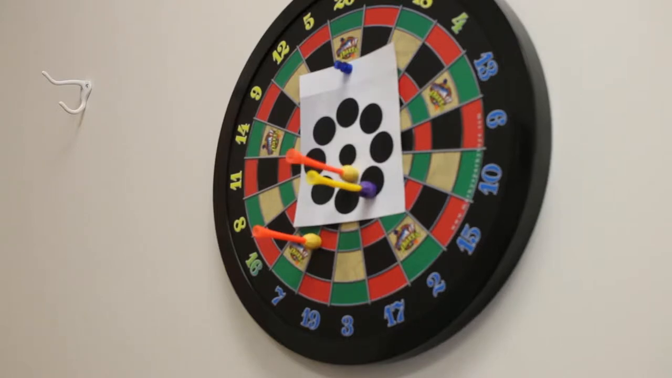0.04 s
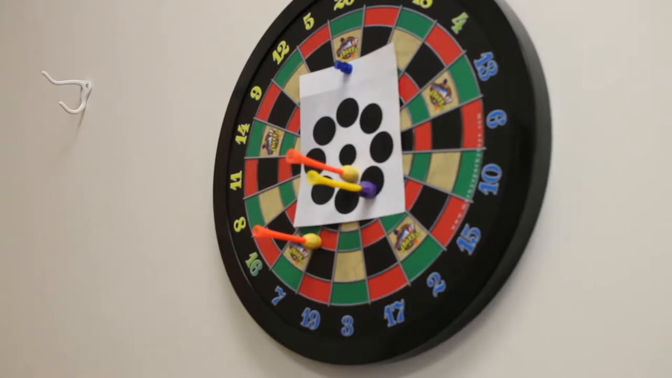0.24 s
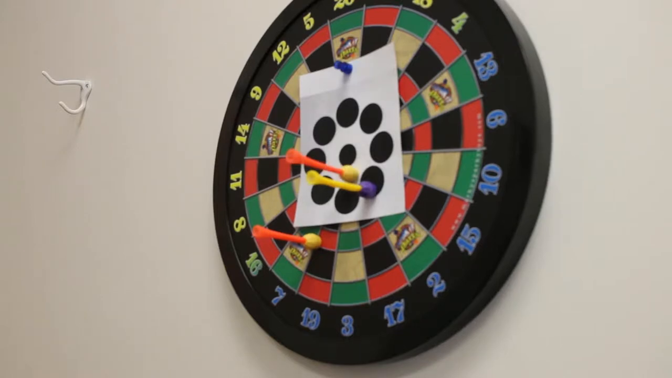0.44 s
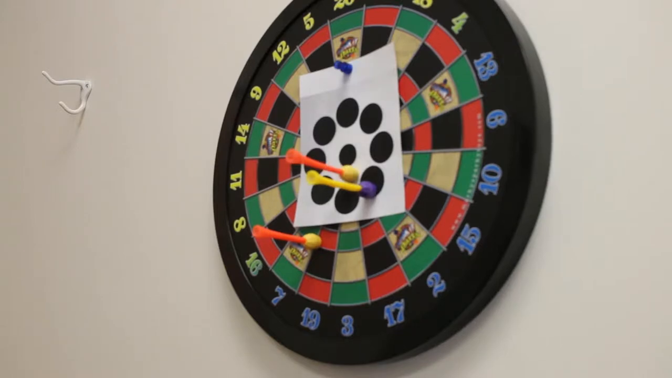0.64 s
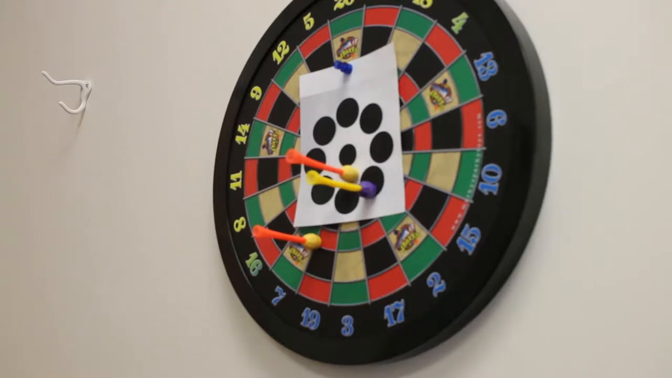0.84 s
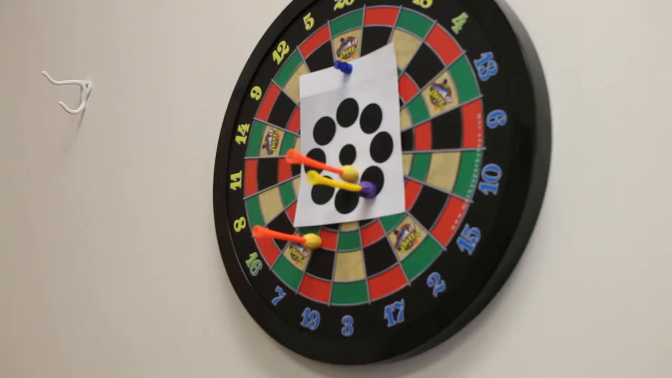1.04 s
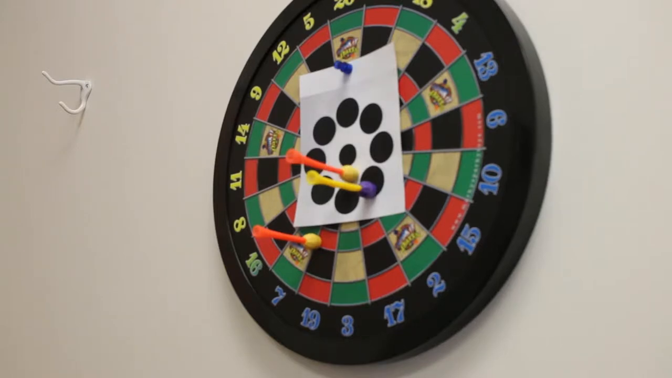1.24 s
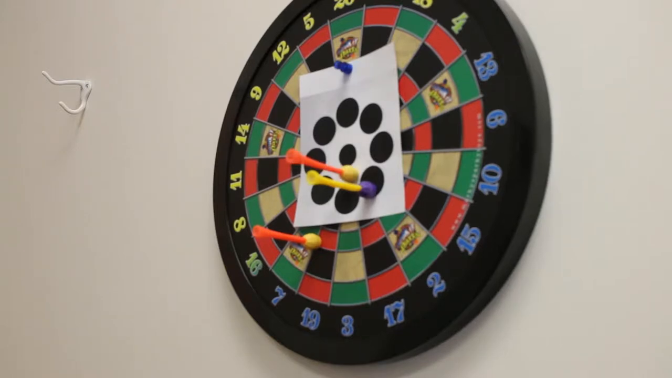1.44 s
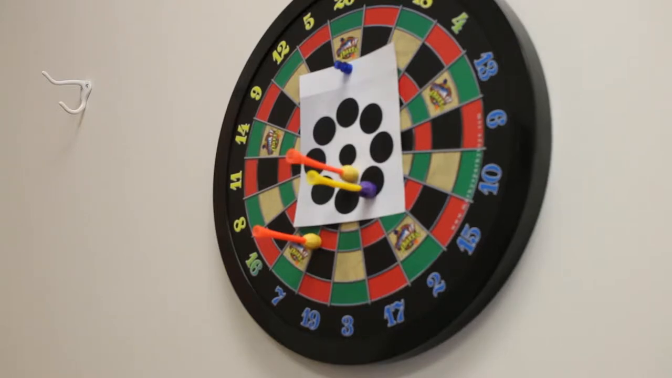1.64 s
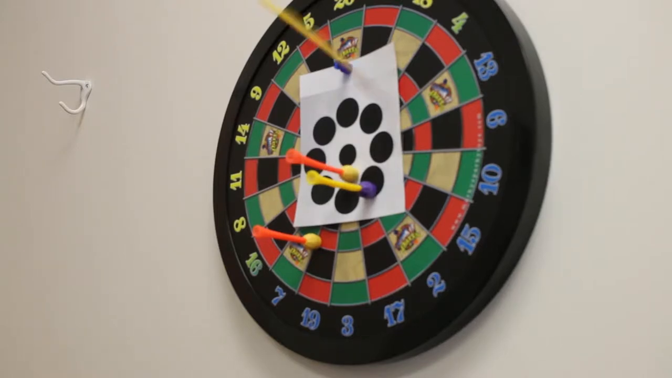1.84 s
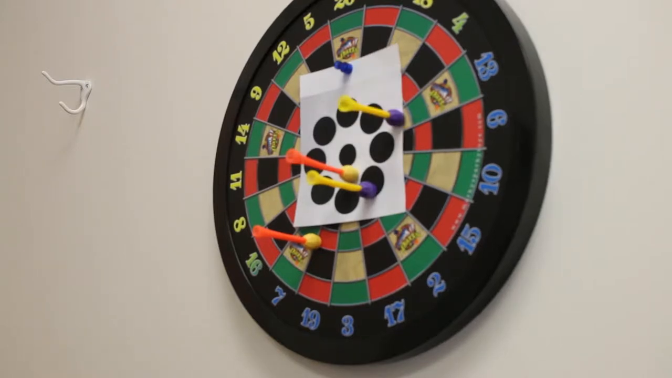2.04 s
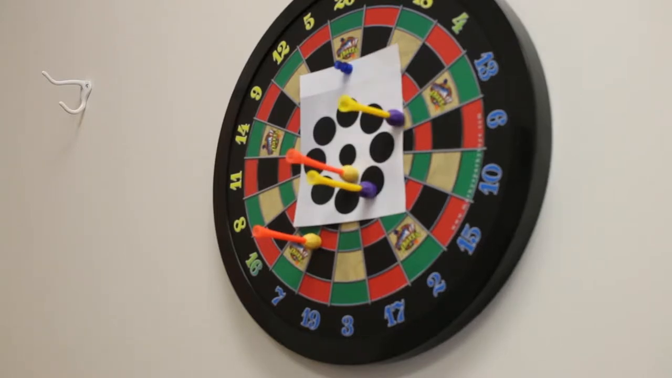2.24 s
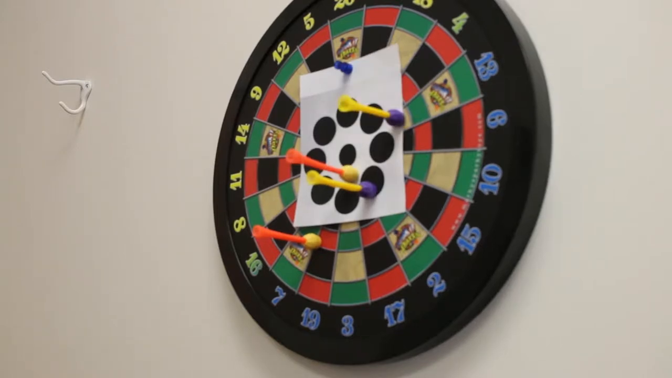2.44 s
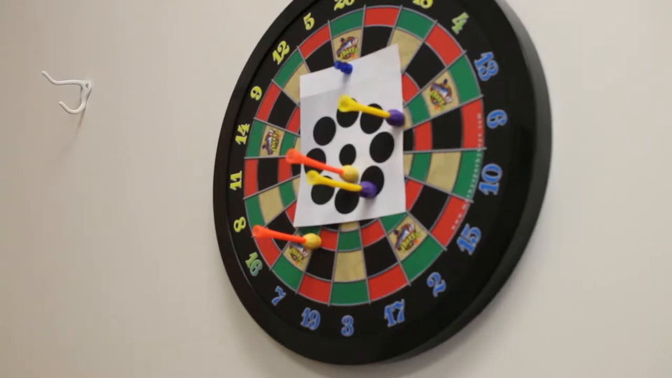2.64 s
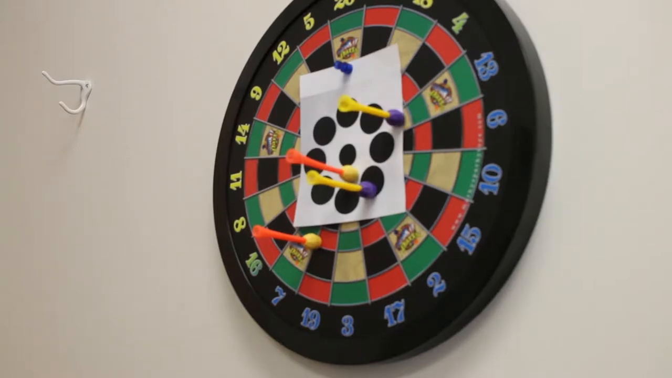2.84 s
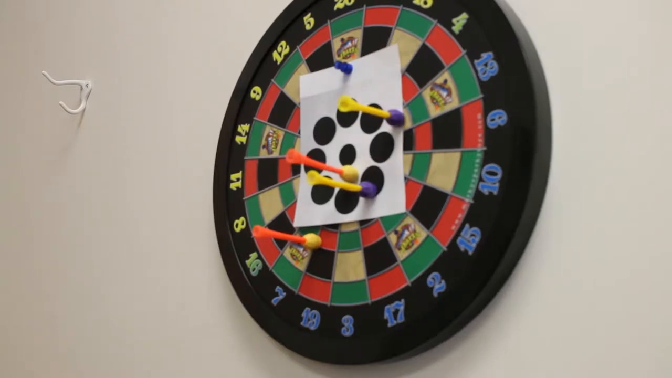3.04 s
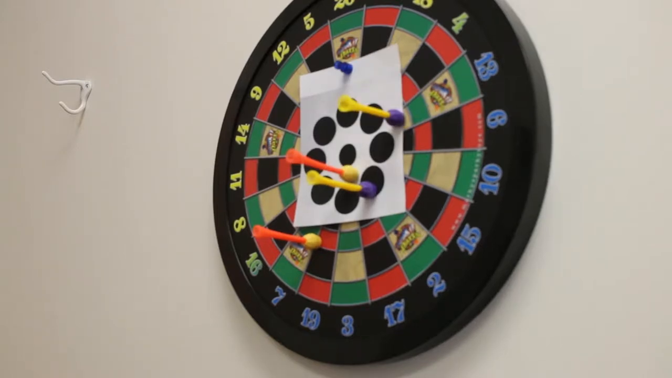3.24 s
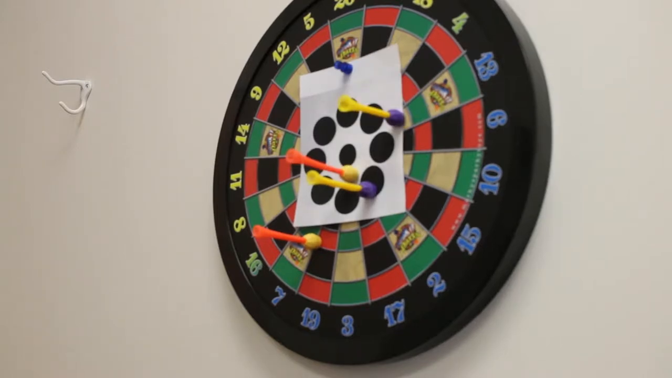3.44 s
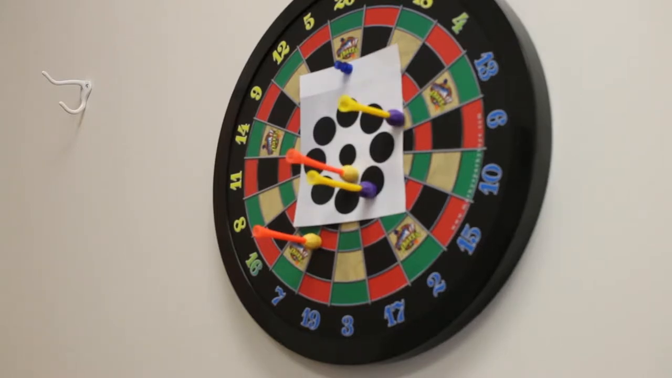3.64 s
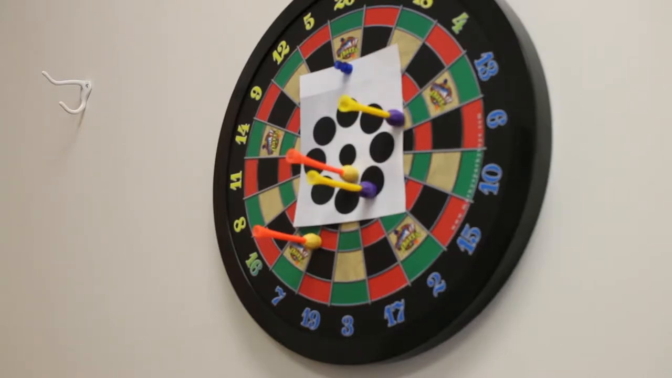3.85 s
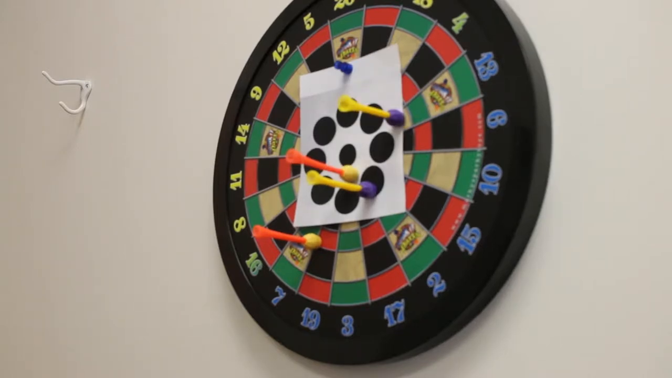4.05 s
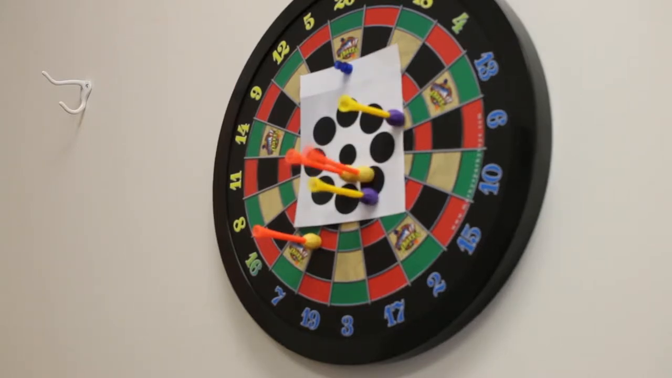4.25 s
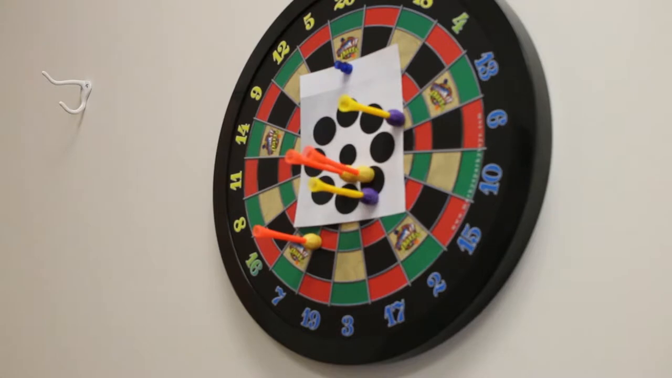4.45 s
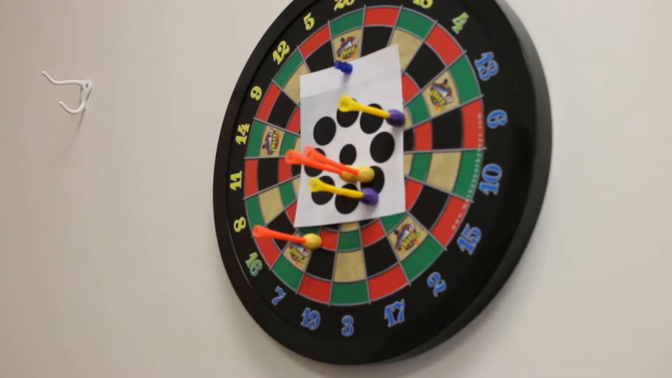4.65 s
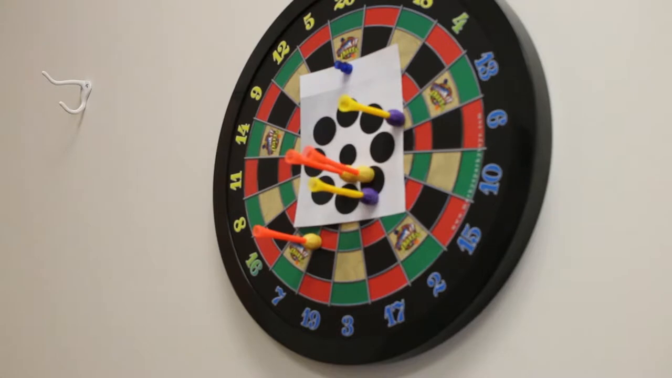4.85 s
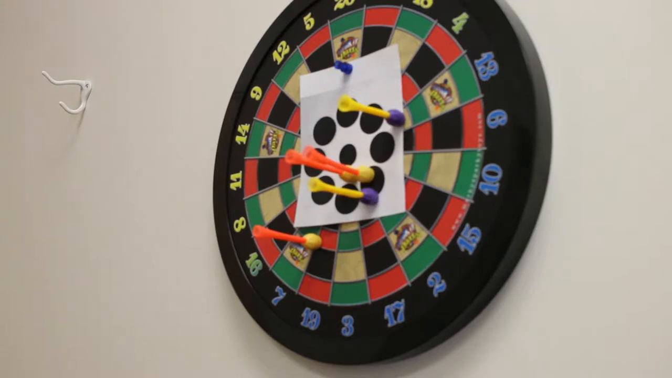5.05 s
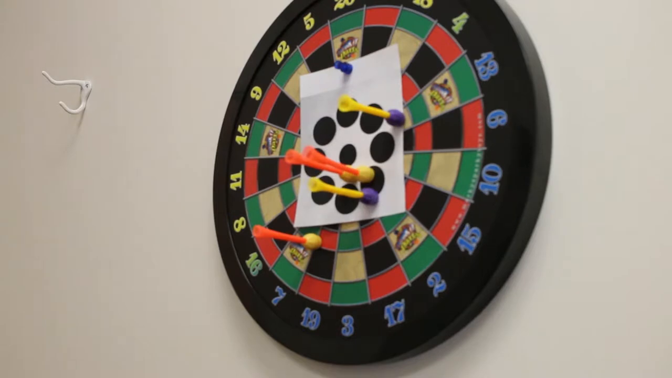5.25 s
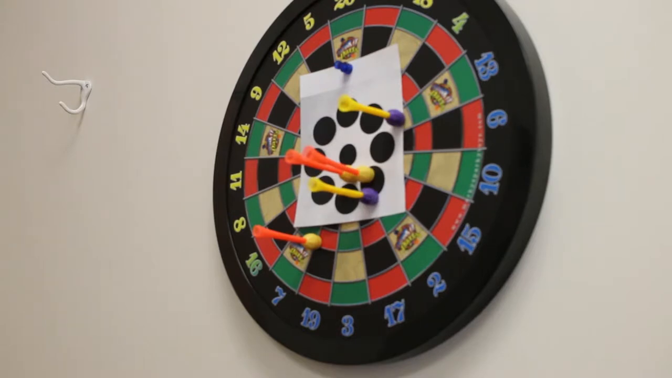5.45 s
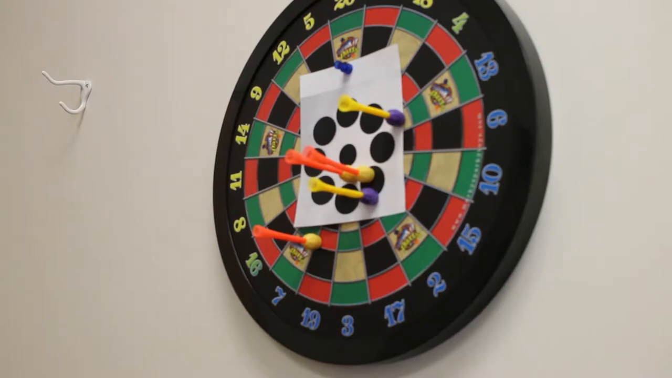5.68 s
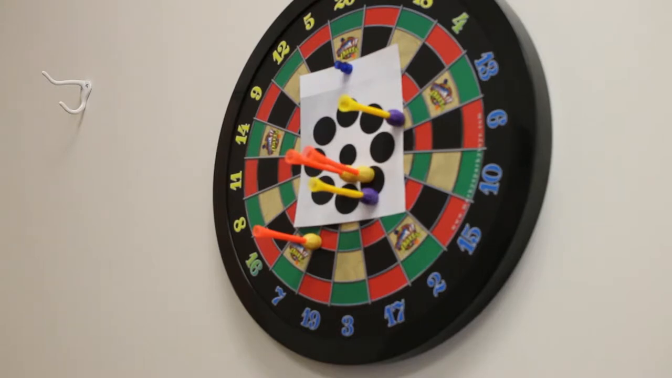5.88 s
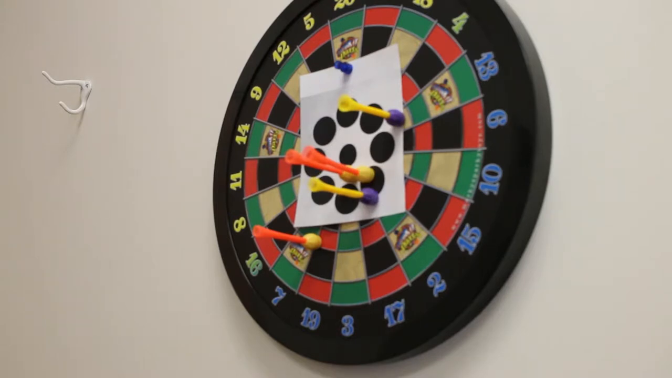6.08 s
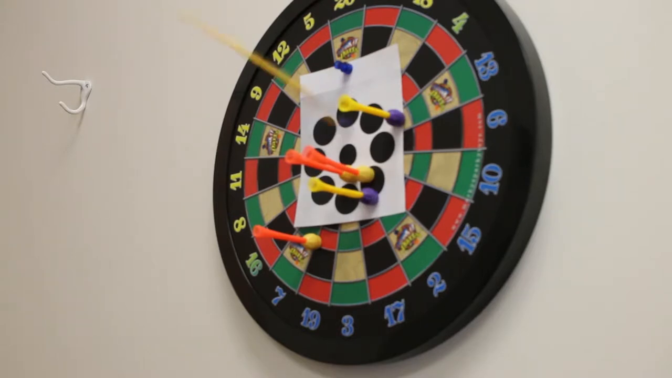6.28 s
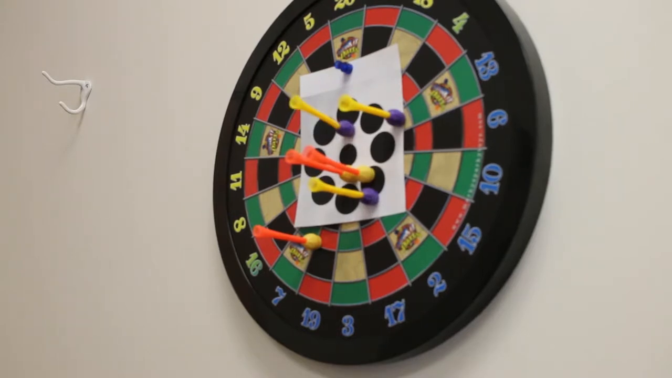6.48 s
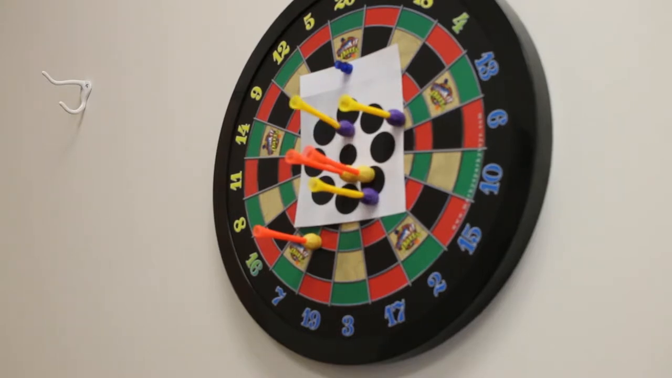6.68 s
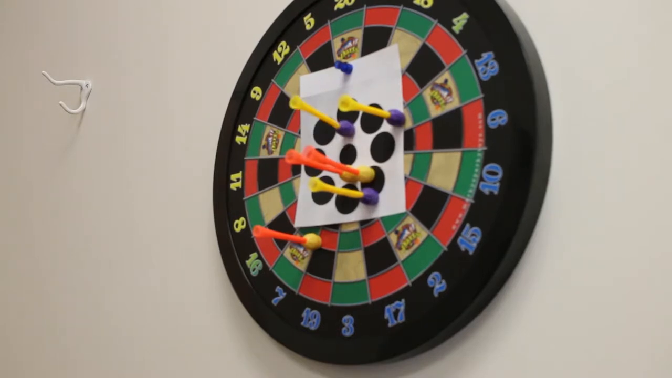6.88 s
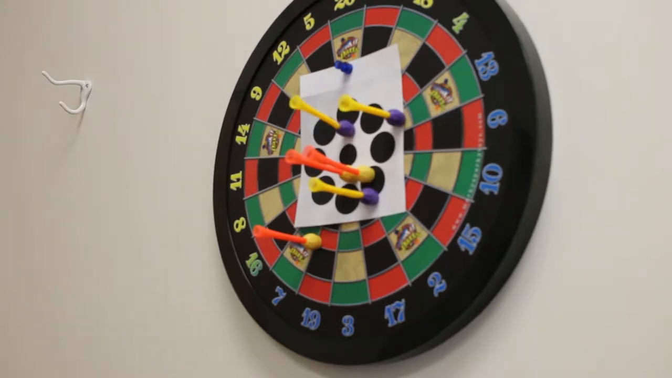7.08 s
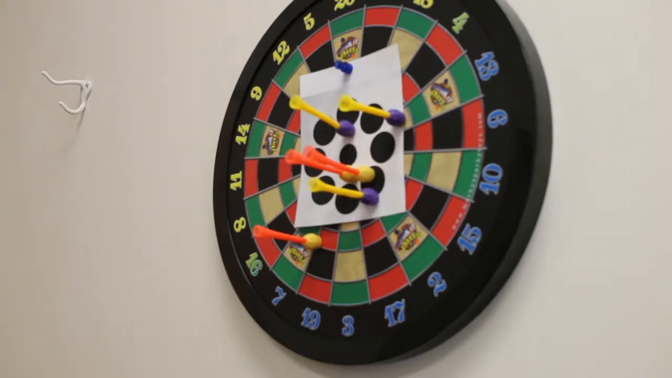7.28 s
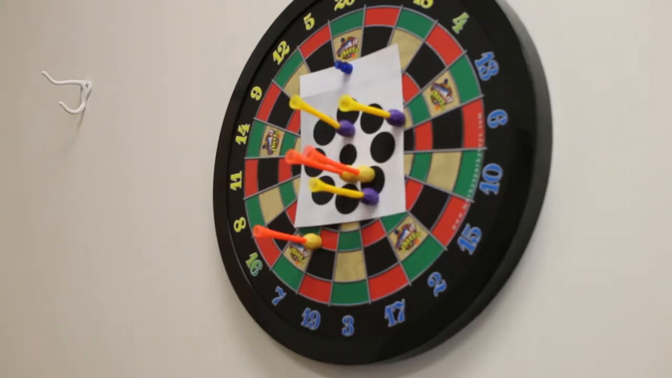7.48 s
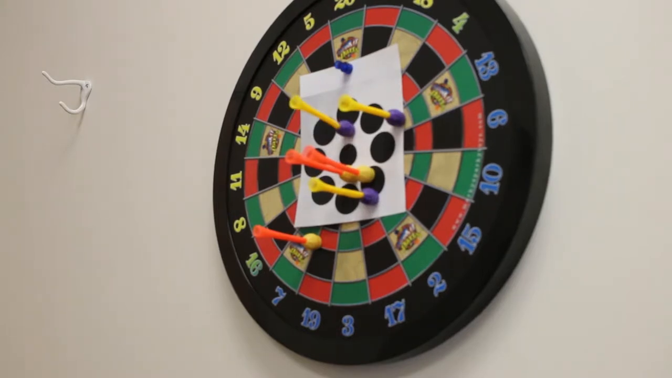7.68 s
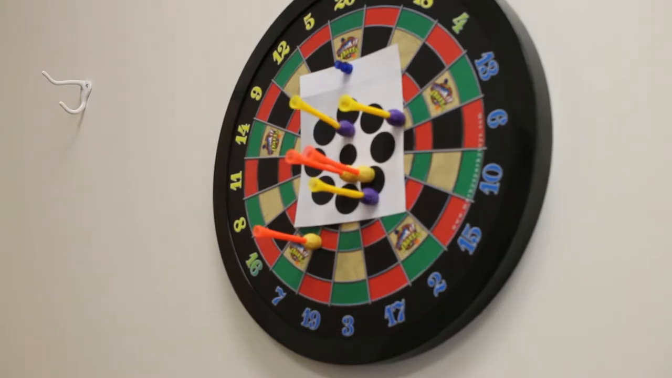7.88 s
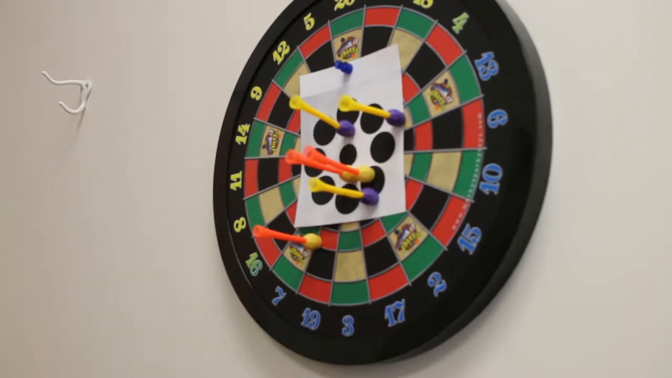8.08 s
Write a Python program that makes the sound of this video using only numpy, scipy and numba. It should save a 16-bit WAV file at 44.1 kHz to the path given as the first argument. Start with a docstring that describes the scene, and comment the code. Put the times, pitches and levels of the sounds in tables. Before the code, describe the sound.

In a quiet, rumbling room, three sharp metallic dart knocks overload the microphone and ring out, then the thrower walks up with swishing clothes.

```python
"""Three magnetic darts slap onto a steel-faced dartboard that hangs on the wall of a bare room.
Each knock is a set of fading board tones plus a noisy magnet snap; fading tones and noise form its echo.
The thrower's clothes rustle and the steps scuff (shaped noise) and boom (low tones), over a room rumble.
The knocks overload the microphone; its gain control ducks and lets the room's ring swell back."""
import sys
import numpy as np
from scipy import signal
from scipy.fft import rfft, irfft
from scipy.io import wavfile
from scipy.ndimage import uniform_filter1d, minimum_filter1d
from numba import njit

SR = 44100
rng = np.random.default_rng(int(sys.argv[2]) if len(sys.argv) > 2 else 0)


def to_wav(sig):
    """Store sig (one row per channel, or 1-D mono) as 16-bit WAV at the path in sys.argv[1].

    Samples outside -1..1 are clipped; the rate is SR.
    """
    pcm = np.clip(np.atleast_2d(sig), -1, 1) * 32767
    pcm = np.round(pcm).astype(np.int16)
    wavfile.write(sys.argv[1], SR, pcm.T)  # frames by channels


N = 358091
TIME = np.arange(N) / SR  # seconds


def undb(db):
    """Turn decibels into a plain gain."""
    return 10 ** (np.asarray(db) / 20)


def unit(x):
    """Scale a sound to an rms (average strength) of 1."""
    return x / np.sqrt(np.mean(x ** 2))


def colour(x, points, tilt_db=0):
    """Filter along a curve of (Hz, dB) points, plus a tilt in dB per octave."""
    octave = np.log2(np.fft.rfftfreq(len(x), 1 / SR) + 1)  # the 1 avoids log of zero
    hz, db = np.transpose(points)
    curve_db = np.interp(octave, np.log2(hz), db) + tilt_db * octave
    return irfft(rfft(x) * undb(curve_db), len(x))


def fade(t, t60):
    """Die away smoothly, 60 dB down after t60 seconds."""
    return np.exp(-np.log(1000) * t / t60)


def add(out, at, sound):
    """Mix a sound in at a time in seconds, cut off at the end of the scene."""
    i = int(at * SR)
    out[i:i + len(sound)] += sound[:len(out) - i]


# The colour of the room's rumble. Each row: frequency in Hz, level in dB.
RUMBLE_COLOUR = [(12, -41.5), (20, -19), (54, -1.5), (175, -6.5), (207, -3), (238, -14), (274, -10),
                 (324, -14.5), (352, -21.5), (478, -22), (767, -27.5), (834, -29.5), (1870, -32.5),
                 (2090, -34), (15500, -38.5)]


def background(rumble_db=-48, hiss_side_db=-62):
    """Low room rumble, the same in both ears, under a thin hiss with opposite sign in each ear."""
    rumble = undb(rumble_db) * unit(colour(rng.standard_normal(N), RUMBLE_COLOUR))
    hiss = undb(hiss_side_db) * rng.standard_normal(N)
    return rumble + hiss * np.array([[1], [-1]])


# The basic colour of rubbing cloth and soles. Each row: frequency in Hz, level in dB.
SCUFF_COLOUR = [(60, -20.5), (170, -1), (450, 0), (800, 2), (1500, -1.5), (2300, -3), (4200, -8),
                (6000, -15.5), (10000, -22), (16000, -29.5)]


def rub(count, tilt_db, hz, grain_db=1.0, peak_db=5):
    """Friction: noise whose strength wavers in grains, with one broad resonance, at rms 1."""
    slow_noise = uniform_filter1d(rng.standard_normal(count), size=400)
    grain = undb(grain_db * unit(slow_noise))
    noise = colour(grain * rng.standard_normal(count), SCUFF_COLOUR, tilt_db)
    resonance = [(hz / np.sqrt(2), 0), (hz, peak_db), (hz * np.sqrt(2), 0)]
    return unit(colour(noise, resonance))


def stroke(at, db, rise_s, fall_s, tilt_db, hz):
    """One rubbing movement: friction swells to its peak at the given time, then dies away."""
    out, start = np.zeros(N), max(at - .5, 0)
    t = TIME[:2 * SR] + start - at  # zero at the peak
    swell = np.exp(-(np.minimum(t, 0) / rise_s) ** 2 - np.maximum(t, 0) / fall_s)
    add(out, start, undb(db) * swell * rub(len(t), tilt_db, hz))
    return out


# The thrower shifts on the spot. Each row: time of the peak in seconds, level in dB.
FIDGET_TIMES = [(0.02, -57.5), (5.15, -62.5)]


def sleeves(swing_lead_s=0.29, swing_db=-60, drop_lag_s=0.56, drop_db=-61):
    """Cloth rubs as the arm swings before each dart and drops after it, and as the thrower shifts."""
    swings = [(at - swing_lead_s, swing_db) for at, *_ in DART_HITS]
    drops = [(at + drop_lag_s, drop_db) for at, *_ in DART_HITS]
    out = np.zeros(N)
    for at, db in [*swings, *drops, *FIDGET_TIMES]:
        out += stroke(at, db, rise_s=0.17, fall_s=0.36, tilt_db=-0.4, hz=1330)
    return out


# Clothes swish as the thrower walks up to the board. Each row: time of the peak in seconds, level in dB.
WALK_SWISHES = [(7.06, -52), (7.58, -51.5), (7.73, -52.5), (7.96, -52.5)]
# Quick rubs of cloth on cloth. Each row: time of the peak in seconds, level in dB, tilt in dB per octave.
CLOTH_BRUSHES = [(0.28, -53.5, 6.5), (7.85, -47, -1), (8.05, -43, 0.5)]


def clothes():
    """Cloth friction: long, slow swells for the swishes of walking and short ones for quick brushes."""
    out = np.zeros(N)
    for at, db in WALK_SWISHES:
        out += stroke(at, db, rise_s=0.12, fall_s=0.3, tilt_db=1, hz=1660)
    for at, db, tilt_db in CLOTH_BRUSHES:
        out += stroke(at, db, rise_s=0.022, fall_s=0.02, tilt_db=tilt_db, hz=1810)
    return out


# The thrower's steps. Each row: time in seconds, sole scuff level in dB, scuff tilt in dB per octave,
# heel level in dB, floor pitch in Hz.
FOOTSTEPS = [(0.522, -47.5, -3, -37.5, 154), (6.95, -46, -3, -43.5, 202.2), (7.175, -46, -1, -44, 151),
             (7.565, -49, 1, -48, 147.5)]


def steps(heel_rise_s=0.024, floor_t60_s=0.66, roll_lag_s=0.05, roll_db=-8):
    """The sole scuffs, the floor booms softly under the heel, then the weight rolls on with a dull rub."""
    out, t = np.zeros(N), TIME[:SR]
    boom = (1 - np.exp(-t / heel_rise_s)) * fade(t, floor_t60_s)
    for at, sole_db, tilt_db, heel_db, hz in FOOTSTEPS:
        out += stroke(at, sole_db, rise_s=0.034, fall_s=0.035, tilt_db=tilt_db, hz=1110)
        add(out, at, undb(heel_db) * boom * np.sin(2 * np.pi * hz * t))
        # roll_db counts from the heel level
        out += stroke(at + roll_lag_s, heel_db + roll_db, rise_s=0.054, fall_s=0.05, tilt_db=-5, hz=464)
    return out


def small_tick(at=0.9575, db=-24, hz=1350, t60=0.0033, thin_hz=550, dull_hz=2600):
    """One faint, dry, dull tick: a very short fading tone with its lows and highs filtered off."""
    out, t = np.zeros(N), TIME[:SR // 20]
    tick = -undb(db) * fade(t, t60) * np.sin(2 * np.pi * hz * t)
    band = signal.butter(2, [thin_hz, dull_hz], "band", fs=SR, output="sos")
    add(out, at, signal.sosfilt(band, tick))
    return out


# A magnet's rim touches just before it lands flat, or chatters as it settles.
# Each row: time in seconds, level in dB, pitch in Hz, time to fade by 60 dB in seconds.
RIM_TOUCHES = [(1.9294, -6, 7220, 0.0097), (4.291, -10.5, 5960, 0.0088), (6.372, -11, 6030, .01),
               (6.3768, -13, 9150, 0.0084)]


def rim_ticks(rasp_db=-6):
    """Darts that arrive askew tick: each rim touch is a short high tone roughened with noise."""
    out, t = np.zeros(N), TIME[:SR // 10]
    for at, db, hz, t60 in RIM_TOUCHES:
        tone = np.sin(2 * np.pi * hz * t)
        rasp = undb(rasp_db) * rng.standard_normal(len(t))
        add(out, at, undb(db) * fade(t, t60) * (tone + rasp))
    return out


# The tones (modes) the board rings with; each spot that is hit favours others.
# Each row: frequency in Hz, time to fade by 60 dB in seconds, then the level in dB before filtering
# when hit at the first, second and third spot.
BOARD_MODES = [(208.0, 0.05, -22.0, -18.0, -19.0), (429.0, 0.039, -8.0, -23.0, -13.0),
               (472.0, 0.045, -4.0, -3.0, -9.0), (585.0, 0.027, -15.0, -4.0, -1.0),
               (704.0, 0.033, -9.0, -11.0, -6.0), (812.0, 0.031, -6.0, -4.0, -7.0),
               (916.0, 0.035, -20.0, -2.0, -8.0), (993.0, 0.034, -7.0, -11.0, -10.0),
               (1098.0, 0.022, -17.0, -2.0, -16.0), (1304.0, 0.03, -11.0, -14.0, -12.0),
               (1468.0, 0.038, -15.0, -12.0, -10.0), (1624.0, 0.029, -10.0, -11.0, -16.0),
               (1901.0, 0.037, -13.0, -8.0, -17.0), (2343.0, 0.055, -14.0, -10.0, -11.0),
               (2778.0, 0.041, -16.0, -15.0, -13.0), (3225.0, 0.045, -19.0, -13.0, -10.0),
               (3688.0, 0.023, -14.0, -5.0, -9.0), (4207.0, 0.025, -10.0, -6.0, -18.0),
               (5350.0, 0.018, -13.0, -16.0, -9.0)]
# The colour of the snap of magnet on steel. Each row: frequency in Hz, level in dB.
SNAP_COLOUR = [(200, -14), (1500, -7), (4000, 1.5), (5500, 2), (7500, -0.5), (11000, -3), (16000, -6.5)]


def knock(mode_dbs, contact_ms, snap_db, snap_t60=0.012):
    """One dart: a short push bends the board while the magnet snaps onto the steel."""
    t = TIME[:SR // 4]
    board = np.zeros(len(t))
    for (hz, t60, *_), db in zip(BOARD_MODES, mode_dbs):
        board -= undb(db) * fade(t, t60) * np.cos(2 * np.pi * hz * t)
    # a small plate hardly radiates long waves, so the lows are weakened
    board = signal.sosfilt(signal.butter(1, 170, "high", fs=SR, output="sos"), board)
    push = t * np.exp(-t / (contact_ms / 1000))
    pushed_board = signal.fftconvolve(board, push / push.sum())[:len(t)]
    snap = unit(colour(rng.standard_normal(len(t)), SNAP_COLOUR)) * fade(t, snap_t60)
    return pushed_board + undb(snap_db) * snap


# The dart strikes. Each row: time in seconds, knock level in dB, contact time in milliseconds,
# magnet snap in dB relative to the knock level, echo level in dB, echo tilt in dB per octave.
DART_HITS = [(1.93, 12, 0.051, -13, -0.5, -0.8), (4.2806, 10.5, 0.068, -12, -2.1, 0.23),
             (6.3635, 10.5, 0.053, -8, 0.5, -0.03)]


def darts():
    """Three knocks, each on another spot, so each rings the board's tones in another mix."""
    out = np.zeros(N)
    _, _, *spots = np.transpose(BOARD_MODES)
    for (at, db, contact_ms, snap_db, *_), mode_dbs in zip(DART_HITS, spots):
        add(out, at, undb(db) * knock(mode_dbs, contact_ms, snap_db))
    return out


# Narrow tones that linger in the echo.
# Each row: frequency in Hz, level in dB relative to the echo level, time to fade by 60 dB in seconds.
LINGERING_TONES = [(360, -23.5, 0.61), (436.6, -20.5, 0.48), (483.6, -13.5, 0.39), (851, -23, 0.44),
                   (945, -27.5, 0.36), (1029, -26, 0.18), (1084, -29, 0.51), (1478, -29.5, 0.52),
                   (1910, -26.5, .3), (2324, -24.5, 0.28), (2636, -33.5, 0.27), (2746, -29, 0.4),
                   (3260, -27.5, 0.22)]


def ringing():
    """A few lightly damped resonances of board and room outlast each knock as fading tones."""
    out, t = np.zeros(N), TIME[:SR]
    ring = sum(undb(db) * fade(t, t60) * np.sin(2 * np.pi * hz * t) for hz, db, t60 in LINGERING_TONES)
    for at, *_, echo_db, _ in DART_HITS:
        add(out, at, undb(echo_db) * ring)
    return out


# The knock as the room returns it, gathered from all directions. Each row: centre of the band in Hz,
# level in dB before the early boost and echo settings, time to fade by 60 dB in seconds.
ROOM_BANDS = [(60.7, -20, 0.51), (153, -2.5, 0.59), (270, -5.5, .6), (355, 7.5, 0.47), (460, 8, 0.48),
              (610, 4.5, 0.36), (1019, -4, 0.52), (1750, -4.5, 0.45), (2870, -7.5, 0.47), (4300, -11, 0.44),
              (5050, -16, 0.43), (7960, -22, 0.29), (11100, -27, 0.33), (16000, -41, 0.21)]


def room(build_s=0.0037, early_db=1, early_t60=0.06, patchy_db=2):
    """Near walls answer first, then dense reflections (noise) die away, the high treble soonest."""
    out, t = np.zeros(N), TIME[:SR]
    octave = np.log2(np.fft.rfftfreq(SR, 1 / SR) + 1)
    centres = np.log2([row[0] for row in ROOM_BANDS])
    build_up = 1 - np.exp(-(t / build_s) ** 2)
    onset = build_up * (1 + undb(early_db) * fade(t, early_t60))
    # the board's many small modes feed the room unevenly, the same way for every dart
    ripple_db = patchy_db * unit(uniform_filter1d(rng.standard_normal(len(octave)), size=60))
    for at, *_, echo_db, tilt_db in DART_HITS:
        tilt_curve_db = tilt_db * (octave - np.log2(1000))  # pivots at 1 kHz
        noise = rfft(rng.standard_normal(SR)) * undb(echo_db + ripple_db + tilt_curve_db)
        # each row of eye picks out one band, which blends into its neighbours
        for band, (_, db, t60) in zip(np.eye(len(ROOM_BANDS)), ROOM_BANDS):
            band_noise = irfft(noise * np.interp(octave, centres, band), SR)
            add(out, at, undb(db) * onset * fade(t, t60) * band_noise)
    return out


def scene():
    """All sources sit in the middle; only the background hiss differs between the ears."""
    thrower = sleeves() + clothes() + steps()
    board = rim_ticks() + darts() + ringing() + room()
    return background() + thrower + small_tick() + board


@njit
def follow(size, attack, release):
    """Track a level, closing a set share of the gap per sample: one share going up, one going down."""
    out, e = np.empty(len(size)), 0.
    for i in range(len(size)):
        e += (size[i] - e) * (attack if size[i] > e else release)
        out[i] = e
    return out


def record(dry, top_db=-6.5, attack_s=0.0019, hold_s=0.028, release_s=0.081, slew_s=0.0014, top_hz=15900):
    """Gain control reacts too late for the first swings, which clip; it holds, then recovers in the echo."""
    level = follow(np.abs(dry).max(axis=0), 1 / (attack_s * SR), 1 / (release_s * SR))
    needed = 1 / np.maximum(level / undb(top_db), 1)
    # hold: keep the lowest gain needed over the last hold_s seconds
    half = int(hold_s * SR / 2)
    wanted = minimum_filter1d(needed, 2 * half + 1, origin=half)
    # the gain itself moves smoothly
    gain = 1 - follow(1 - wanted, 1 / (slew_s * SR), 1 / (slew_s * SR))
    clipped = np.clip(dry * gain, -1, 1)
    # a steep filter removes the highest treble
    return signal.sosfilt(signal.ellip(8, .05, 60, top_hz, fs=SR, output="sos"), clipped)


dry = scene()
out = record(dry)
to_wav(out)
```